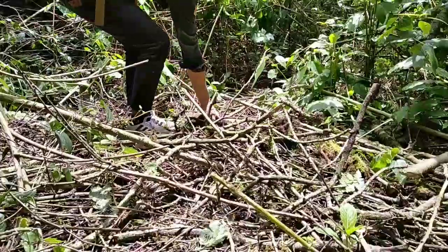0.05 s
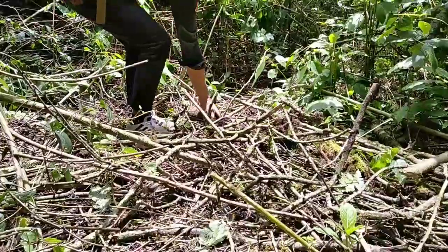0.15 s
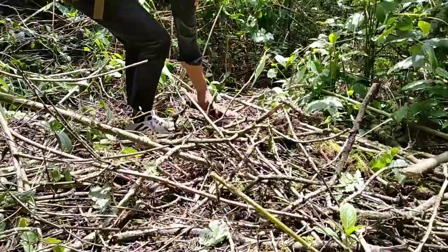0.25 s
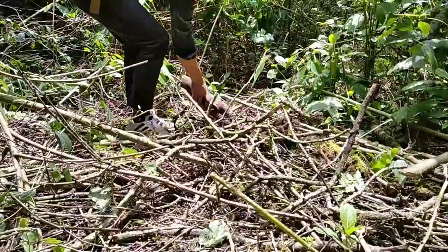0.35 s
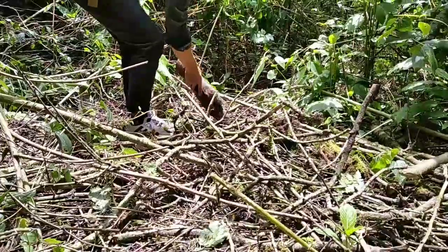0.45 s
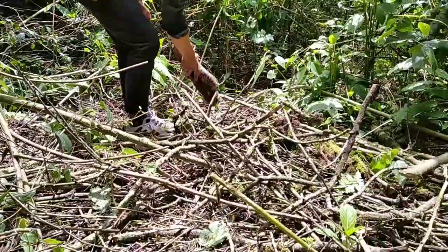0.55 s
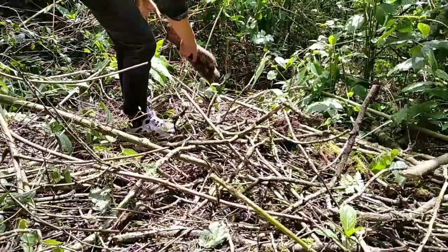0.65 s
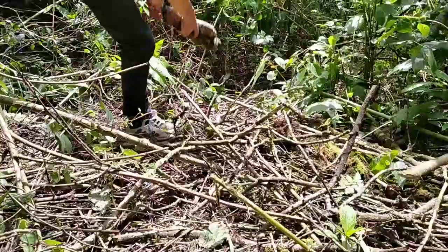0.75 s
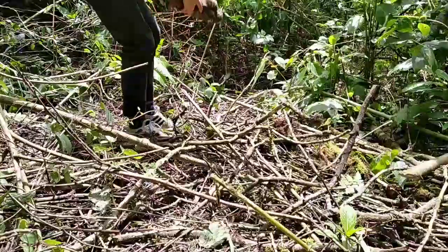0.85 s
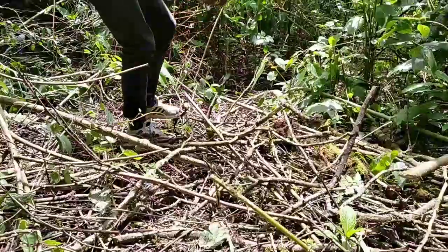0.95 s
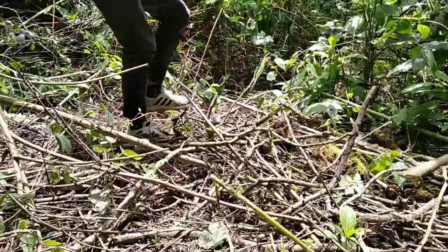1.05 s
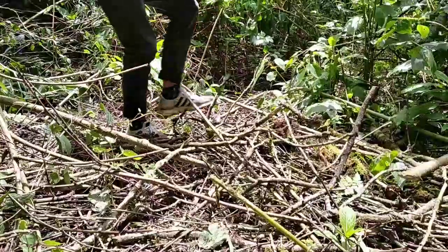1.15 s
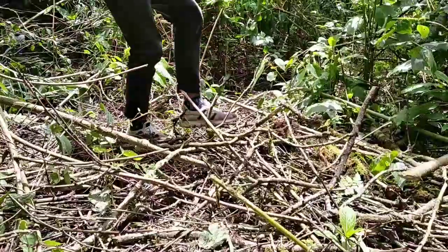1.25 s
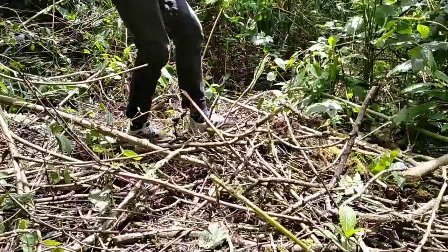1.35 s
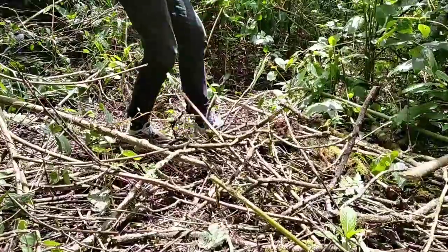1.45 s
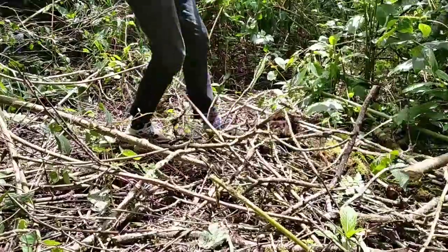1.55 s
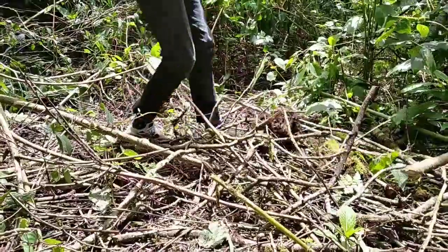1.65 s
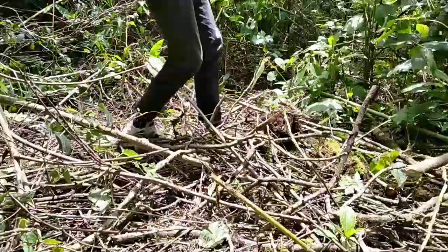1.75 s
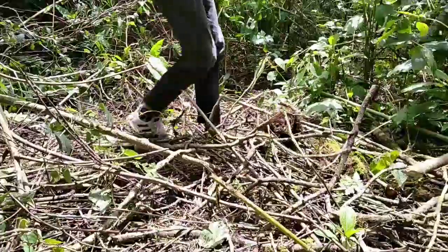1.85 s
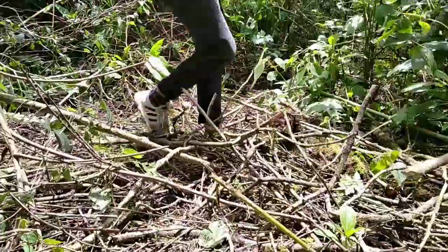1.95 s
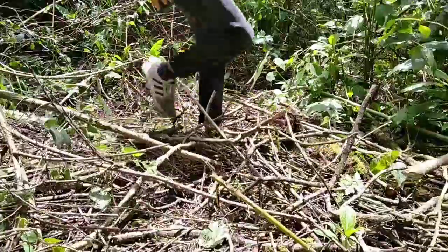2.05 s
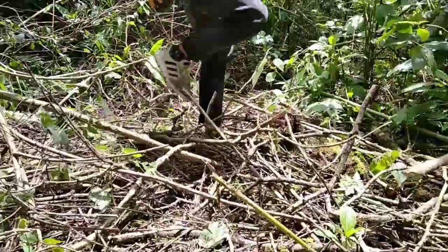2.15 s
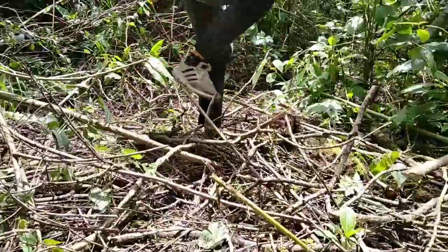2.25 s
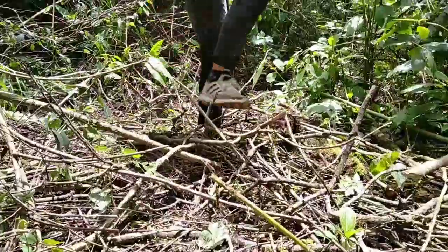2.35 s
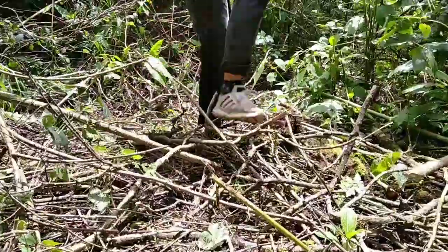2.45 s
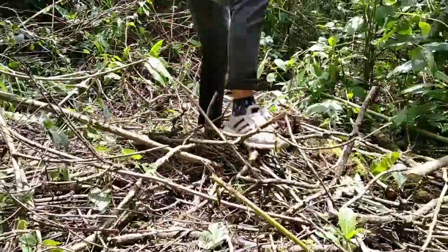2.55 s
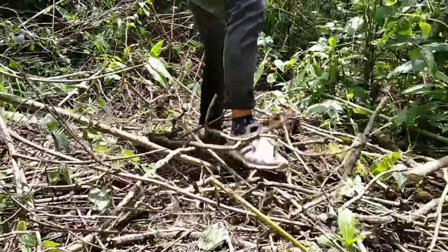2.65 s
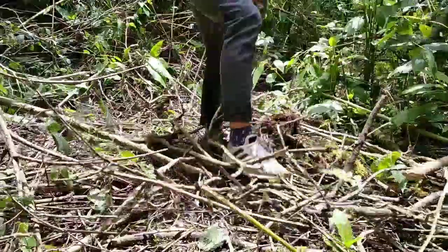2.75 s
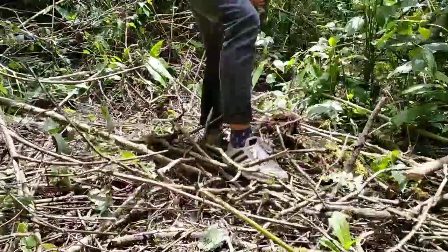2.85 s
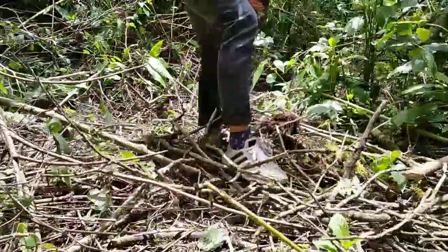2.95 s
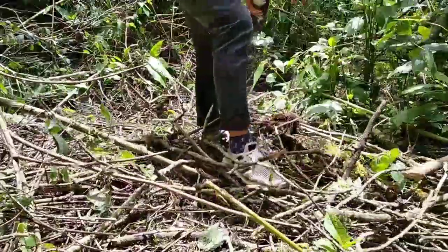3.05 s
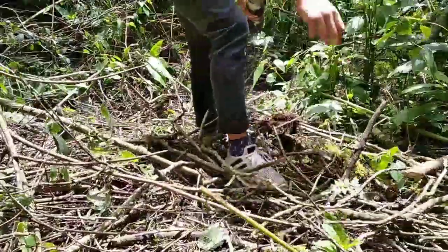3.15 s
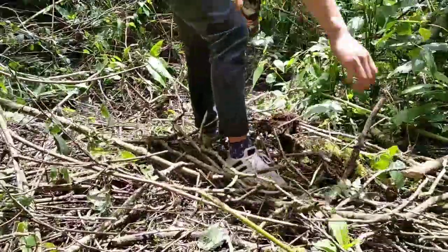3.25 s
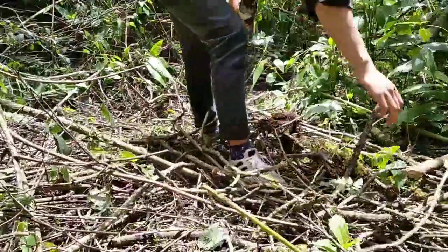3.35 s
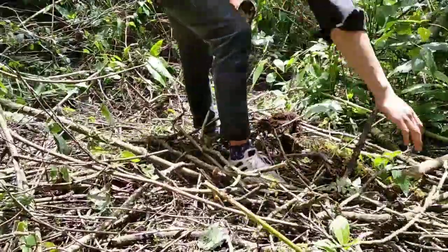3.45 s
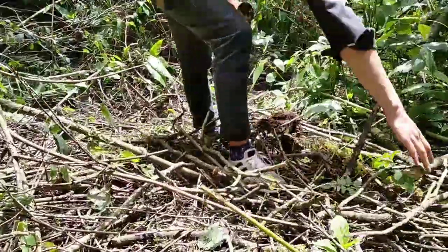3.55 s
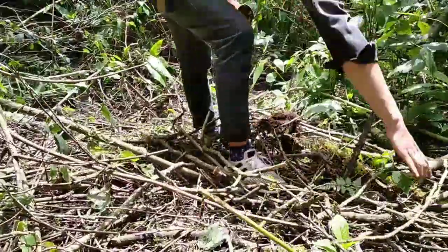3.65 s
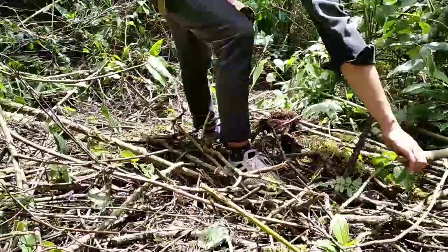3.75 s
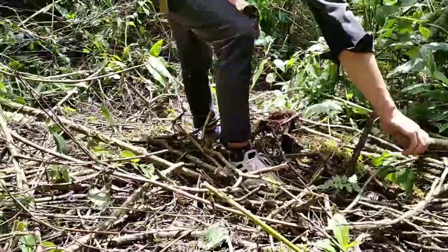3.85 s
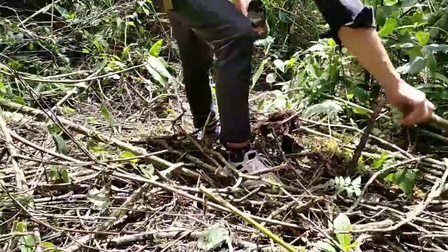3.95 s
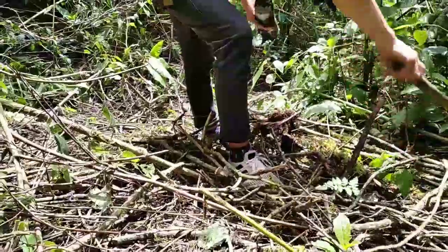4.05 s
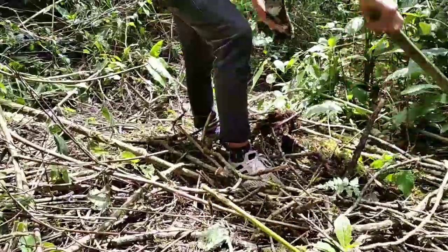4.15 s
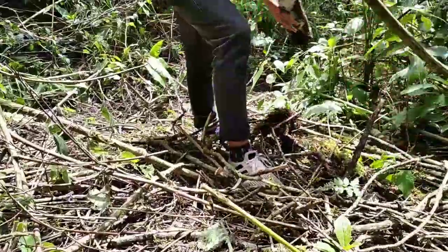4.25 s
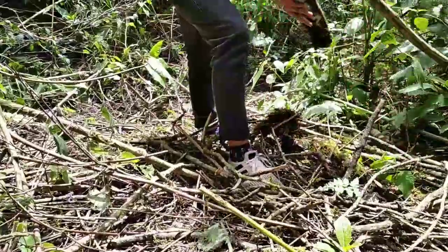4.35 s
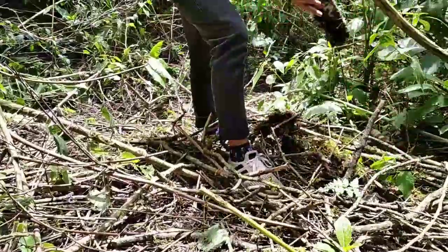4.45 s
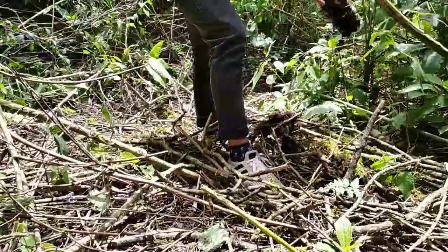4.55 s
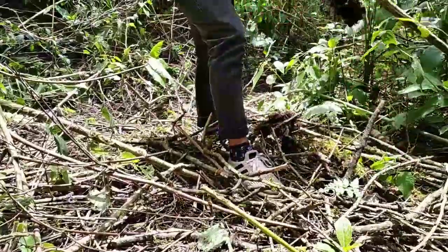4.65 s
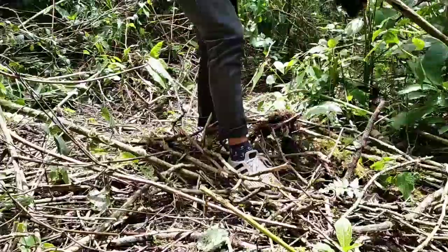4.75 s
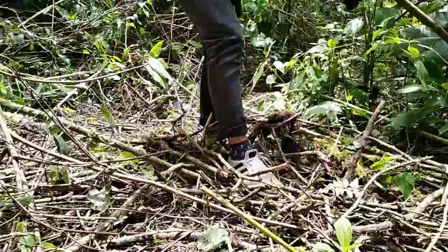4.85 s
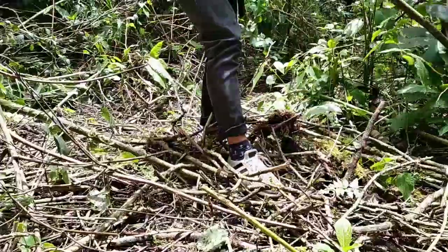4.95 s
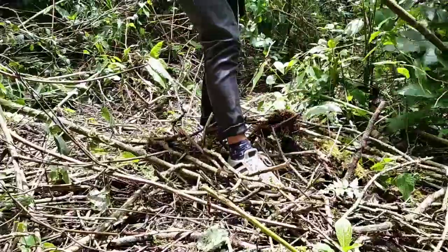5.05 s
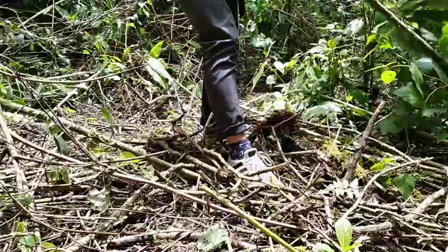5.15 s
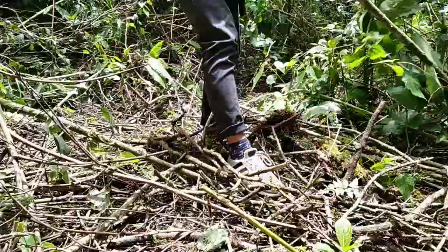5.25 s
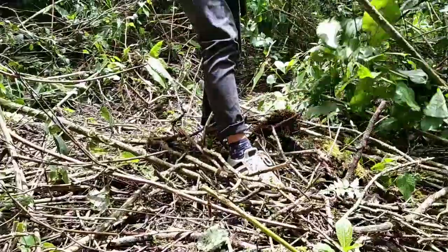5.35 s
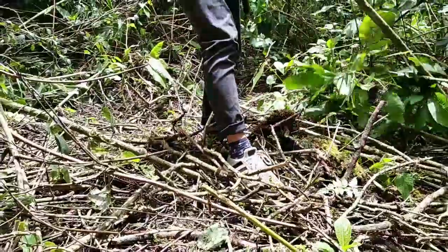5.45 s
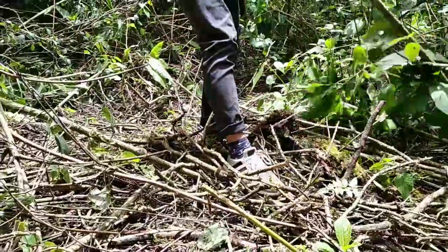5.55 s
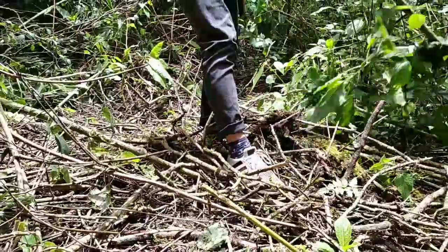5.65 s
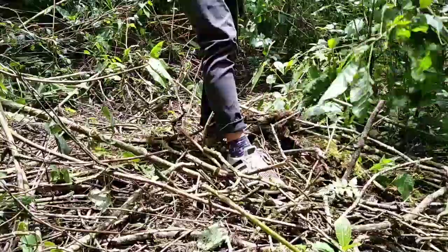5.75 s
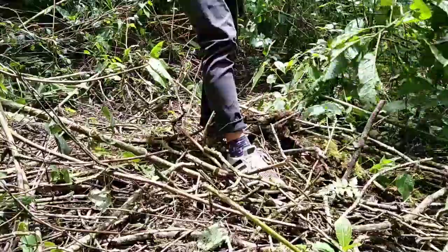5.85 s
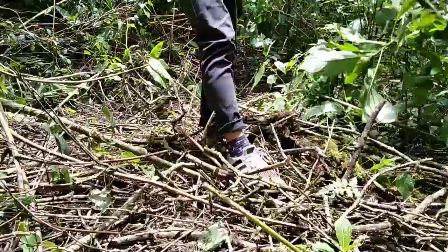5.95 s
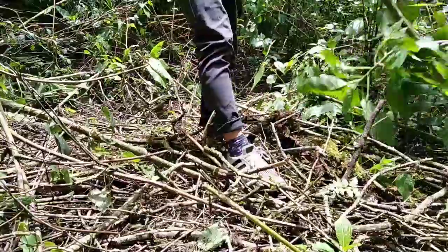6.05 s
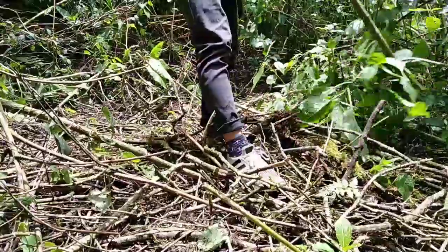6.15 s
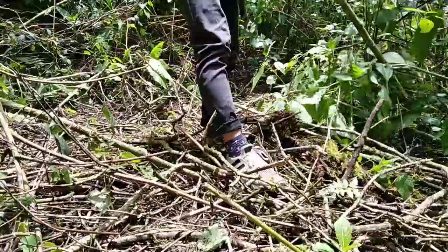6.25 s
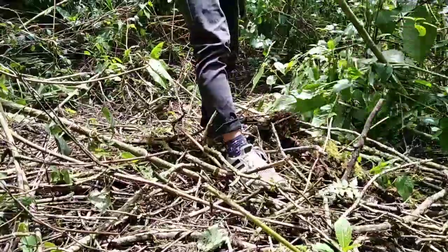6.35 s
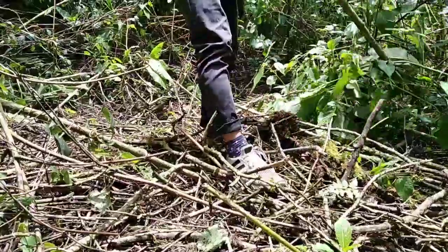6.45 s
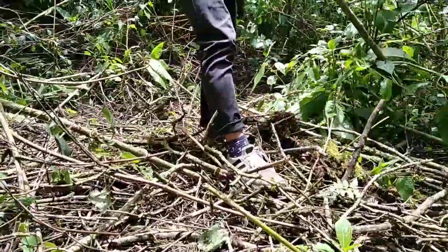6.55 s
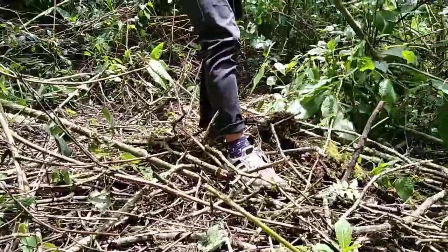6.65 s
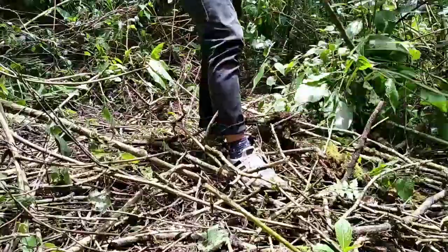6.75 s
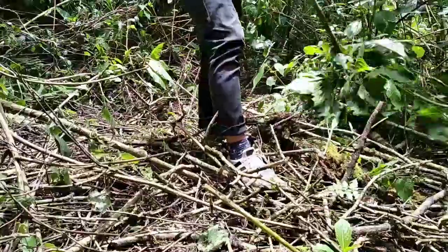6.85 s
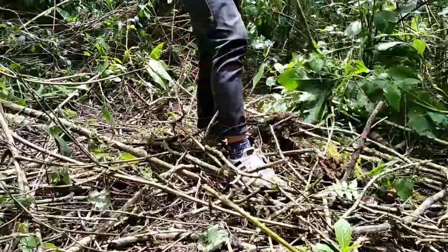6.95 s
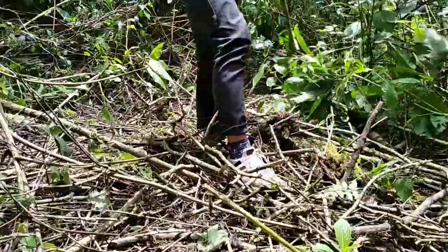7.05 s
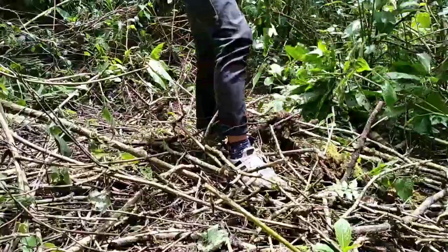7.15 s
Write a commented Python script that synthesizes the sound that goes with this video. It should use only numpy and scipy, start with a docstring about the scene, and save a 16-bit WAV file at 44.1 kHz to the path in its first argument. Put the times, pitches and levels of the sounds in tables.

```python
"""Dry twigs snap under slow steps in a forest, litter crackles, then a leafy branch is pulled out by hand.
Cracks are short noise bursts through wood resonances; scattered noise tails return them from the trees.
Litter and leaves are clumped tiny grains over rubbing noise. Near the end a soft low flutter, like wing beats,
made of low-pitched puffs, is heard mostly on the left. Faint filtered noise is the forest air."""
import sys
import numpy as np
from scipy import signal
from scipy.fft import rfft, irfft
from scipy.io import wavfile
from scipy.ndimage import uniform_filter1d

SR = 44100
rng = np.random.default_rng(int(sys.argv[2]) if len(sys.argv) > 2 else 0)


def waveform_to_disk(signal):
    """Save audio, clipped to [-1, 1], as 16-bit WAV at the path in sys.argv[1]."""
    frames = np.transpose(np.atleast_2d(signal))
    scaled = np.clip(frames, -1, 1) * 32767
    samples = np.round(scaled).astype(np.int16)
    wavfile.write(sys.argv[1], SR, samples)


N = 317520

# bands of a crack, thud, wood, splinter, fibre: low edge f/Hz, high edge f/Hz
BAND_EDGES_HZ = [(140, 760), (700, 2400), (2400, 6000), (6000, 15500)]
# colour of a crack: f/Hz, gain/dB
CRACK_SPECTRUM = [(150, -2), (320, 9), (410, 6.5), (560, 13.5), (720, -1), (1000, 0), (1250, -3.5),
                  (1800, 0), (3100, 3), (4300, 3.5), (5200, -2.5), (7000, 1.5), (8800, 3), (11000, -5),
                  (14000, -8)]
# drag of the leafy branch: t/s, leaf swish level/dB, dull stem brush level/dB (before trims)
DRAG_CURVE = [(4.1, -56, -64), (4.35, -53.5, -60), (4.42, -50.5, -60), (4.75, -54, -61),
              (4.93, -53.5, -60.5), (5.0, -48, -57.5), (5.08, -54, -62.5), (5.42, -47.5, -53),
              (5.49, -49, -56.5), (5.56, -45, -52), (5.62, -49, -53.5), (5.76, -49, -56), (5.83, -45, -49),
              (5.92, -50, -55), (6.03, -62, -68), (6.1, -55, -61), (6.2, -46.5, -52.5), (6.31, -51.5, -56),
              (6.42, -50, -58.5), (6.51, -55.5, -60), (6.6, -56, -61), (6.73, -62.5, -66), (6.8, -45, -51),
              (6.95, -41.5, -48), (7.2, -53.5, -58)]

PULL_S = 4.1  # the branch is pulled from here on
BENDING_RATIO = 3  # second bending mode of a free stick over its first
THIN_HZ = 1980  # ring of a thin twig


def twigs(thin_clean_db=-2, mode_echo_db=-9, ground_pan_db=-1.5, branch_pan_db=2, spot_count=3):
    """Every listed twig breaks, and its echo among the trees differs from spot to spot."""
    # breaking twigs: t/s, crack level/dB over 1 ms, wood body/dB and thud/dB re crack,
    # wood ring f/Hz, tearing time/s, forest echo/dB
    snap_rows = [(0.2157, -34, -8, -11, 1720, 0.0021, -1), (0.2849, -33, -10, -23, 2230, 0.0013, -7),
                 (0.299, -39, -15, -25, 2200, 0.0016, -17), (0.384, -34, -7, -41, 1790, 0.0035, -2),
                 (0.404, -44, -18, -25, 2000, .0015, -8), (0.446, -34.5, -14, -26, 1560, 0.0013, -6.5),
                 (0.48, -47, -7, -15, 1700, .0015, 10), (0.9041, -12.5, -7.5, -14, 960, 0.0017, -8.5),
                 (1.0031, -31.5, -10, -25, 2020, 0.0021, -3), (1.172, -55, -7, -20, 2100, 0.0017, -16),
                 (1.199, -50, -30, -35, 2300, .002, -12), (1.376, -57, 3, 6, 1100, 0.0061, 1),
                 (1.395, -38, -3.5, -14, 1690, 0.002, 0.5), (1.403, -38.5, -4.5, -8, 1520, 0.0023, -7),
                 (1.4688, -36, -2, -8, 1700, 0.009, 2.5), (1.4902, -32.5, -3, -22, 1940, 0.0047, -5),
                 (1.516, -36, -9, -21, 1800, 0.0035, -7), (1.538, -46, -2, -11, 1600, .003, -13),
                 (1.579, -41, -6, -8, 1880, .003, -3), (1.6003, -14.5, -13.5, -11, 2600, 0.0017, -9),
                 (1.6696, -10.5, -12, -22, 1940, 0.0017, -0.5), (1.7238, -31, -2, -14, 1870, 0.0058, -17),
                 (1.741, -41, -5, -18, 1800, 0.0017, -13), (1.788, -42, -2, -18, 1700, 0.0017, -12),
                 (1.808, -43, -2, -10, 1300, 0.0022, -2), (1.912, -41.5, -4.5, -15, 2000, 0.0075, 0),
                 (1.9333, -38.5, -1.5, -18, 1550, 0.0011, 3), (1.9697, -33.5, -9, -15, 1880, 0.001, 5),
                 (1.9864, -18.5, -12.5, -13.5, 1370, 0.0019, -7.5), (2.007, -35.5, -5, -21, 1700, .003, 5),
                 (2.033, -27.5, -15.5, -31, 2930, 0.0028, -5),
                 (2.0415, -22.5, -11, -9.5, 940, 0.0031, -7.5), (2.075, -48, 2, -19, 1500, .0015, -6),
                 (2.227, -47.5, -12, -20, 1712, .002, -3), (2.325, -52, -3, -18, 2000, .0015, -10),
                 (2.381, -51, -6, -20, 2000, .002, -8), (2.484, -49.5, -10, -19, 2000, 0.0033, -8),
                 (2.6326, -38.5, -15, -12, 1700, 0.011, -18), (2.656, -31, -10, -16, 2180, 0.0059, 1),
                 (2.661, -35.5, -12, -27, 2080, 0.0057, 1), (2.692, -40.5, -1, -11, 2000, 0.0027, -1),
                 (2.704, -47, 1, -5, 1500, 0.0033, -8), (2.743, -54, -10, -3, 1800, 0.0034, -8),
                 (2.787, -49, -3, -17, 1900, .004, -4), (2.807, -42, 5, -7, 1080, 0.0031, 4),
                 (2.8231, -31.5, 0, -5, 2130, 0.0021, -4), (2.8366, -29, -16, -21, 2290, 0.003, -1.5),
                 (2.853, -43, -7, -24, 2200, .0015, -8), (2.865, -44, 1.5, -14, 1980, 0.0039, 0),
                 (2.8791, -32.5, -9.5, -10, 1750, 0.0028, -2), (2.899, -47.5, 10.5, 4.5, 1410, 0.0032, -19),
                 (2.932, -41, -11, -22, 2400, 0.0046, -11), (3.0027, -13.5, -14, -25, 2250, 0.003, -8),
                 (3.0778, -14, -12.5, -27, 960, 0.0024, -9), (3.0864, -23, -25, -35, 2300, 0.0051, -20),
                 (3.0954, -29, -14, -31, 2304, 0.0019, -18), (3.1317, -22.5, -10, -26, 2020, 0.0046, -4),
                 (3.139, -25.5, -17, -30, 1500, 0.0024, -12), (3.154, -27, -10, -17.5, 2200, 0.0077, -5),
                 (3.166, -34, -9, -24, 2100, .0018, -16), (3.2055, -32, -13, -16, 1940, 0.0011, -17),
                 (3.2173, -22, -7, -23, 2670, 0.0023, -10), (3.2357, -27, -15, -16, 1940, 0.0014, -12),
                 (3.2487, -20.5, -9, -17, 2100, 0.0035, -14), (3.254, -16.5, -20, -15, 2080, 0.002, -27),
                 (3.3243, -15, -18, -44, 2520, 0.0029, -11), (3.3719, -23.5, -7, -9, 2300, 0.0015, -11),
                 (3.3955, -22, -15, -26, 1690, 0.0076, -14), (3.4025, -12, -12.5, -17, 1580, 0.0016, -21),
                 (3.415, -40, -6, -26, 1900, .002, -14), (3.4285, -36, -15, -20, 1700, .003, -11),
                 (3.4397, -18, -15, -40, 1700, 0.0026, -20), (3.45, -39.5, 7, -3, 1200, .002, -9),
                 (3.4558, -26, -8, -38, 1670, 0.0061, -12), (3.5737, -43.5, -4, -13, 1870, 0.00087, -5),
                 (3.6288, -32.5, -60, -28, 2240, 0.0015, -9), (3.674, -59, 15.5, -8, 1540, 0.0016, -11),
                 (3.761, -48.5, 9, 5, 1370, 0.0024, -11), (3.807, -44, -10, -28, 2200, .0015, -6),
                 (3.8655, -15.5, -1, -18, 1670, 0.0048, -26), (3.87, -23, -8, -21, 2340, 0.0066, -4),
                 (3.968, -37, -38, -33, 2260, 0.0013, 0), (4.0054, -23, -10, -18, 2200, 0.0048, -3),
                 (4.027, -32, -18, -42, 1910, 0.002, -18), (4.044, -36, -19, -30, 1980, .001, -14),
                 (4.058, -30.5, -20, -39, 1830, 0.0029, -10), (4.1435, -45.5, -14, -22, 2200, 0.0011, -14),
                 (4.2202, -30.5, -16, -25, 2250, 0.0024, -9), (4.2638, -33.5, -10, -26, 1000, 0.0037, 0),
                 (4.277, -45, 3.5, -4, 1010, 0.0048, -16), (4.284, -50, -11, -5, 1320, .003, -14),
                 (4.297, -42, -21, -4, 2020, 0.0062, -2), (4.3079, -26.5, -14, -16, 1650, 0.0019, -4.5),
                 (4.65, -43.5, -5.5, -6, 2120, 0.0039, 5), (4.8842, -59.5, 17, 14.5, 1030, 0.0017, 0),
                 (4.9036, -42, 0.5, -29, 2250, 0.0019, -14), (5.122, -20, -14, -42, 2110, 0.0022, -13),
                 (5.1303, -42.5, 2.5, -6.5, 1820, 0.0018, -16), (5.187, -44, -6, -22, 2700, .0012, -12),
                 (5.2028, -16, -15.5, -25, 1915, 0.0046, -10), (5.278, -43, -3, -22, 2100, .002, -14),
                 (5.291, -43.5, 2, -19, 990, 0.0048, -20), (5.332, -32, -22, -32, 2200, 0.0046, 3),
                 (5.346, -21.5, -12.5, -30, 1906, 0.0016, -6.5), (5.373, -51.5, 10.5, -24, 1830, 0.0019, 8),
                 (5.5349, -40.5, -5, -5.5, 1781, 0.0019, 6), (5.554, -39.5, -6, -22, 2340, .003, 1),
                 (5.64, -41, -7, -10, 980, 0.0018, -12), (5.664, -43.5, -3, -20, 3750, 0.0011, -12),
                 (5.7202, -35, -1, -16, 1940, 0.00092, -3), (6.116, -38.5, -7.5, -24, 1650, 0.006, -15),
                 (6.158, -34.5, -12, -33, 2100, .0042, -12), (6.2292, -34, -2, -15, 1870, 0.002, -4),
                 (6.273, -31.5, -22, -30, 2070, 0.002, -11), (6.4432, -34, -11.5, -30, 2206, 0.011, -3),
                 (6.555, -41.5, 1, -10, 2020, 0.0063, -10), (6.871, -42, 3, -10, 1010, 0.0032, -8),
                 (6.8791, -21.5, -8.5, -28, 1960, 0.0029, -2.5), (7.009, -38, -6, -29, 2000, 0.0041, 4.5)]
    # modes of the loudest sticks: t/s of the snap, clean break/dB re tearing, [(f/Hz, level/dB over 1 ms), ..]
    mode_rows = [(0.2171, 11, [(470, -42.5), (1640, -37), (8930, -44)]), (0.9055, 8.5, [(300, -43),
                 (540, -34), (930, -25), (1480, -24.5), (1800, -42), (9000, -14.5)]),
                 (1.6009, 3, [(480, -39.5), (2150, -24), (2700, -26), (3500, -29.5), (4300, -25),
                 (7200, -20)]), (1.6698, -19, [(2050, -21), (2500, -18), (3400, -37), (4400, -24),
                 (7300, -16.5), (9500, -20)]), (1.9862, 9, [(330, -40), (560, -45), (900, -33.5),
                 (1550, -34.5), (3200, -40), (5800, -21), (9300, -33)]), (2.0429, 6, [(290, -43),
                 (950, -37), (2080, -48), (4100, -29), (9330, -36)]), (2.8231, 14, [(260, -42), (1020, -42),
                 (2200, -27), (2600, -31.5), (3200, -33.5), (9140, -23)]), (3.0043, -13, [(1960, -37),
                 (2450, -27.5), (4570, -26), (7950, -15.5)]), (3.0783, -3, [(550, -42), (950, -30.5),
                 (1250, -34), (3500, -36), (4320, -26), (8880, -41)]), (3.218, -3, [(240, -37.5),
                 (1840, -31), (2680, -23.5), (4520, -31), (9310, -24)]), (3.2548, -5, [(2000, -31),
                 (2400, -25), (3100, -47), (4160, -29.5), (7400, -18), (9500, -36)]),
                 (3.3257, 8, [(1600, -34), (2480, -24), (7560, -22.5)]), (3.3724, 2, [(1700, -30.5),
                 (2480, -21.5), (2750, -33), (4300, -49), (7690, -26)]), (3.4029, 9, [(450, -36.5),
                 (1000, -38), (1700, -24), (2450, -23), (4200, -24), (7400, -27)]),
                 (3.4405, -4, [(1710, -49), (4580, -31), (8510, -32)]), (3.8665, 3, [(280, -35), (620, -29),
                 (1000, -37.5), (1700, -28), (2250, -28), (4500, -27), (7000, -18.5), (8630, -31)]),
                 (4.0056, 10, [(2430, -58), (4590, -35.5), (8350, -31)]), (4.2206, 7, [(280, -57),
                 (2450, -34.5), (3400, -44), (4500, -42.5), (7600, -39)]), (4.2637, 10, [(1000, -47),
                 (1650, -50), (2400, -54), (4300, -36), (9500, -33)]), (4.3072, 15, [(330, -52),
                 (2000, -37), (4000, -32), (8500, -22)]), (5.122, 5, [(480, -43.5), (2200, -51),
                 (8000, -35)]), (5.2038, 5, [(900, -50), (2750, -37.5), (3800, -29.5), (5940, -29),
                 (9400, -34)]), (5.347, 5, [(1000, -61), (1900, -34.5), (4270, -25), (7500, -29),
                 (10110, -20.5)]), (5.5349, -1, [(320, -39.5), (1000, -40.5), (1750, -39.5), (2700, -52),
                 (4200, -45)]), (6.8792, 5, [(1000, -59), (2000, -47), (7300, -25.5)])]
    # change of the tearing noise of such a stick: thud/dB, wood/dB, splinter/dB, fibre/dB
    rasp_change_db = (-6.5, -6, -5, -1)
    direct = np.zeros((2, N))
    spots = np.zeros((spot_count, 2, N))
    clicks = all_round()
    signs = (-1) ** np.arange(len(clicks))  # neighbouring bands join without a notch
    impulse = signal.unit_impulse(clicks.shape[1])
    times_s = np.array(snap_rows)[:, 0]
    own_modes = {np.argmin(abs(times_s - s)): own for s, *own in mode_rows}
    for k, (s, db, wood_db, thud_db, wood_hz, tear_s, echo_db) in enumerate(snap_rows):
        levels_db, rings_hz = stick(db, wood_db, thud_db, wood_hz)
        clean_db, modes = own_modes.get(k, (thin_clean_db, []))
        rasp_db = levels_db + rasp_change_db if modes else levels_db
        pan_db = ground_pan_db if s < PULL_S else branch_pan_db
        add(direct, s, snap(rasp_db, rings_hz, tear_s, pan_db, clean_db, modes))
        ringing = sum(amp(mode_db + mode_echo_db) * mode(impulse, hz) for hz, mode_db in modes)
        echoed = signs * amp(levels_db) @ clicks + np.std(clicks) * ringing
        add(spots[k % spot_count], s, amp(echo_db) * echoed[None])
    return direct + sum(forest(sent) for sent in spots)


def snap(levels_db, rings_hz, tear_s, pan_db, clean_db=-3, modes=(), lead_db=-6, lead_share=0.34,
         grainy_db=2.0, shiver_db=-25, shiver_s=0.02, ring_db=-3, quality=10, push_db=-4, knock_db=-3,
         knock_quality=3, break_s=.0011, break_decay_s=.0003, size=2048):
    """A few fibres give way, one sharp crack, a dying tearing volley rings the stick, the freed ends shiver."""
    t = np.arange(size) / SR - break_s
    since = np.maximum(t, 0)
    before = amp(lead_db) * np.exp(np.minimum(t, 0) / (lead_share * tear_s))
    clean = amp(clean_db) * np.exp(-since / break_decay_s)
    tearing = np.exp(-since / tear_s)
    shiver = amp(shiver_db) * np.exp(-since / shiver_s)
    envelope = np.where(t < 0, before, clean + tearing + shiver)
    grain = amp(grainy_db * rng.standard_normal(size))
    fibres = envelope * grain * rng.standard_normal((2, size))
    crack = unit(colour(levelled(fibres) if modes else fibres, CRACK_SPECTRUM))

    # the stick springs back whole: push and knock are common to both microphones
    shared = crack[:1] * np.ones((2, 1))
    push = band(since * np.exp(-since / (tear_s / 10)), *BAND_EDGES_HZ[0], order=2)
    knock = ring(shared, rings_hz[0] / BENDING_RATIO, knock_quality)
    thud = unit(band(shared, *BAND_EDGES_HZ[0], order=2))
    thud = thud + amp(push_db) * unit(push) + amp(knock_db) * unit(knock)
    sound = amp(levels_db[0]) * unit(thud)

    drives = [shared + 0.77 * crack, crack + 0.13 * shared, crack]
    for drive, db, hz, edges in zip(drives, levels_db[1:], rings_hz, BAND_EDGES_HZ[1:]):
        body = unit(band(drive, *edges))
        if not modes:
            body = body + amp(ring_db) * unit(ring(drive, hz, quality))
        sound = sound + amp(db) * unit(body)
    for hz, db in modes:
        sound = sound + amp(db) * mode(shared if hz < THIN_HZ else crack, hz)
    # rms 1 becomes the energy of 1 ms
    return sound * np.sqrt(SR / 1000 / size) * pan_gains(pan_db)


def stick(db, wood_db, thud_db, wood_hz, splinter_db=-1, wood_share=0.49, db_per_octave=5.5,
          splinter_max_hz=4200, fibre_hz=7620, spread=0.21):
    """Levels (thud, wood, splinter, fibre) and rings (last three); lower-ringing sticks splinter less."""
    thin_octaves = np.log2(wood_hz / THIN_HZ)
    total_splinter_db = splinter_db + wood_share * wood_db + db_per_octave * thin_octaves
    nominal_hz = np.array([min(wood_hz * BENDING_RATIO, splinter_max_hz), fibre_hz])
    upper_hz = nominal_hz * np.exp(spread * rng.uniform(-1, 1, 2))
    return db + np.array([thud_db, wood_db, total_splinter_db, 0]), [wood_hz, *upper_hz]


def mode(x, hz, base_width_hz=110, quality=16):
    """One mode of a loud stick at rms 1; its width has a fixed part and a part that grows with pitch."""
    return unit(ring(x, hz, hz / (base_width_hz + hz / quality)))


def ring(x, hz, quality):
    """One damped mode as a two-pole resonator."""
    r = np.exp(-np.pi * hz / quality / SR)
    return signal.lfilter([1, 0, -1], [1, -2 * r * np.cos(2 * np.pi * hz / SR), r * r], x)


def all_round(size=2048):
    """A crack averaged over all directions has no ripple: one smooth click a band, with the energy of 1 ms."""
    click = kernel(lambda hz: read(CRACK_SPECTRUM, hz), size)
    clicks = [unit(band(click, *edges, order=2)) for edges in BAND_EDGES_HZ]
    return np.array(clicks) * np.sqrt(SR / 1000 / size)


def levelled(x, size=21):
    """Evens out the chance spectral ripple of a short burst, so that later filters alone give its colour."""
    spectrum = np.fft.fft(x)
    log_gain = -np.log(uniform_filter1d(abs(spectrum) ** 2, size, mode="wrap") + 1e-20) / 2
    return np.fft.ifft(spectrum * np.exp(np.conj(signal.hilbert(log_gain)))).real


def twiglets(ground_db=6, branch_db=-1.5, ground_wood_db=-4, branch_wood_db=0, thud_db=-10, vary_db=4,
             spread_db=3.5, wood_hz=1800, tear_s=0.0047, echo_db=-6, count=130):
    """Thin twigs tick by chance, louder and denser with press or drag; green stems knock duller."""
    on_ground = np.arange(N) / SR < PULL_S
    load_db = np.where(on_ground, pressure()[0] + ground_db, follow(DRAG_CURVE)[0] + branch_db)
    work = np.cumsum(amp(load_db / 2))
    chance = rng.uniform(-1, 1, (count, 4))
    out = np.zeros((2, N))
    for k, (when, size, body, ring_step) in enumerate(chance):
        work_share = (k + (when + 1) / 2) / count  # one tick in each equal share of the work
        at = min(np.searchsorted(work, work[-1] * work_share), N - 1)
        wood_db = (ground_wood_db if on_ground[at] else branch_wood_db) + vary_db * body
        tick_db = load_db[at] + spread_db * size
        twig = stick(tick_db, wood_db, wood_db + thud_db, wood_hz * 2 ** (ring_step / 2))
        add(out, at / SR, snap(*twig, tear_s, 0))
    return out + amp(echo_db) * forest(out)


def forest(x, near_db=-10, near_t60=0.17, far_db=-17, far_t60=0.51, ground_db=-13, build_s=0.01):
    """Ground and nearby sticks answer first, then foliage, then far trunks, as decaying scattered noise."""
    # scatter from trunks and foliage: f/Hz, gain/dB
    echo_spectrum = [(100, -27), (400, -23.5), (800, -1), (2000, 4.5), (5000, 2.5), (9000, 8), (15000, 7)]
    t = np.arange(SR) / SR
    reflectors = amp(4.5 * rng.standard_normal(SR))
    scatter = paired(rng.standard_normal((2, SR)) * reflectors)
    power = 0
    for db, t60, rise_s in [(near_db, near_t60, build_s), (far_db, far_t60, 4 * build_s), (ground_db, .04, .002)]:
        tail = amp(-60 * t / t60) * (1 - np.exp(-(t / rise_s) ** 2))
        power = power + (amp(db) * unit(tail)) ** 2
    response = colour(unit(scatter) * np.sqrt(power / SR), echo_spectrum)
    return signal.fftconvolve(x, response, axes=1)[:, :N]


def litter(crisp_trim_db=1):
    """Dead leaves, bark and twig ends crumble under the weight."""
    # colour of the litter: f/Hz, gain/dB
    litter_spectrum = [(88, -28), (150, -15), (306, 6.5), (401, -3.5), (515, 0.5), (661, -17), (1030, -3),
                       (1300, -7), (1770, 4.5), (3030, -7.5), (4210, -2), (5720, -5), (8580, 3),
                       (13900, -15.5), (15000, -31)]
    crisp_db, dull_db = pressure()
    grains = crackle(per_s=2000, spread_db=3.6, rub_db=-12, clump_db=1.1, cycles=1.4)
    return pressed(grains, litter_spectrum, crisp_db + crisp_trim_db, dull_db)


def pressure(press_s=0.023, release_s=0.054, settle_db=-72, settle_dull_db=-74):
    """Crisp and dull litter levels in dB: each press builds up, holds, dies away; settling goes on between."""
    # presses of shoe or hand: start t/s, held t/s, crackle level/dB, dull crunch level/dB (before trims)
    press_rows = [(0.202, 0.45, -63.5, -69), (1.0, .1, -64, -69), (1.44, 0.33, -50.5, -57.5),
                  (1.917, .06, -52, -51), (1.98, .05, -46.5, -57), (2.623, 0.21, -47, -53.5),
                  (2.9, 0.4, -59, -63.5), (3.215, 0.22, -48, -57), (3.741, 0.29, -56, -87)]
    t = np.arange(N) / SR
    power = amp([[settle_db], [settle_dull_db]]) ** 2 * np.ones(N)
    for start_s, held_s, crisp_db, dull_db in press_rows:
        build = np.clip((t - start_s) / press_s, 0, 1)
        release = np.exp(-np.maximum(t - start_s - held_s, 0) / release_s)
        power = power + (amp([[crisp_db], [dull_db]]) * build * release) ** 2
    return 10 * np.log10(power)


def crackle(per_s, spread_db, rub_db, clump_db, cycles, size=192):
    """Many tiny breaks and flicks, each of its own size and pitch, in clumps, over smooth rubbing."""
    when, pitch, strength, *phases = rng.random((round(per_s * N / SR), 5)).T[:, :, None]
    hz = 600 + 14000 * pitch ** 2
    t = np.arange(size) / SR
    sizes = amp(spread_db * np.minimum(-np.log(1 - strength), 4)) * hz ** .7
    envelopes = sizes * np.exp(-hz * t / cycles)
    at = ((when * N).astype(int) + np.arange(size)).ravel()
    ticks = []
    for phase in phases:  # left, right
        grains = envelopes * np.sin(2 * np.pi * (hz * t + phase))
        ticks.append(np.bincount(at, grains.ravel(), N)[:N])
    mix = unit(rattled(np.array(ticks))) + amp(rub_db) * rng.standard_normal((2, N))
    return paired(mottled(mix) * amp(clump_db * wander(30)))


def rattled(ticks, tail_db=-3, t60=.03, size=2048):
    """Each tick bounces briefly among the sticks and leaves around it."""
    tail = levelled(rng.standard_normal((2, size)) * amp(-60 * np.arange(size) / SR / t60))
    bounced = signal.oaconvolve(ticks, unit(tail) / np.sqrt(size), axes=1)[:, :N]
    return ticks + amp(tail_db) * bounced


def mottled(x, patch_db=1.7, size=256):
    """Leaves and scraps of different sizes take turns: the colour shifts in short, narrow patches."""
    z = signal.stft(x, nperseg=size)[2]
    patches = rng.standard_normal(z.shape[:0:-1])  # time, frequency
    patches = uniform_filter1d(uniform_filter1d(patches, 6, axis=0), 5, axis=1)
    return signal.istft(z * amp(patch_db * unit(patches).T), nperseg=size)[1][:, :N]


def pressed(grains, spectrum, crisp_db, dull_db):
    """Plays grains by a crisp and a dull level curve."""
    sound = colour(grains, spectrum)
    crisp = unit(band(sound, 2400, 16000))
    dull = unit(band(sound, 170, 2400))
    return amp(crisp_db) * crisp + amp(dull_db) * dull


def leaves(crisp_trim_db=1.5, pan_db=1.5):
    """Green leaves flick and slide past each other as the branch is drawn out."""
    # colour of the leaves: f/Hz, gain/dB
    leaf_spectrum = [(150, -10.5), (280, -10.5), (450, -16.5), (700, -19), (1000, -10), (1400, -14),
                     (2050, -3.5), (3000, -7), (4200, 0.5), (5100, -7.5), (7000, -1.5), (8900, 3.5),
                     (11500, -7), (14000, -10.5)]
    swish_db, brush_db = follow(DRAG_CURVE)
    grains = crackle(per_s=3000, spread_db=2.8, rub_db=0, clump_db=0.6, cycles=2)
    return pressed(grains, leaf_spectrum, swish_db + crisp_trim_db, brush_db) * pan_gains(pan_db)


def flutter(trim_db=-1, puff_s=0.0081, uneven_db=1):
    """Each beat is one soft puff of a few low cycles."""
    # low flutter in two bouts: t/s, beat rate f/Hz, level/dB (before trim), puff pitch f/Hz
    beat_rows = [(5.54, 11.8, -63, 100), (5.7, 13.3, -48.5, 113), (5.85, 26.5, -47.5, 119),
                 (6.11, 21.5, -51.5, 105), (6.2, 19.3, -54.5, 101), (6.4, 12.7, -55, 105),
                 (6.5, 18.5, -48.5, 122), (6.68, 28, -48, 134), (6.87, 27, -45, 113), (7.0, 21, -47.5, 114),
                 (7.2, 24, -48.5, 102)]
    rate_hz, db, hz = follow(beat_rows)
    started = np.arange(N) / SR > beat_rows[0][0]
    beats = np.cumsum(rate_hz * started) / SR
    from_beat_s = (beats - np.round(beats)) / rate_hz
    envelope = np.exp(-(from_beat_s / puff_s) ** 2 / 2) * (beats > .5)
    puffs = envelope * np.cos(2 * np.pi * hz * from_beat_s)
    return band(puffs, 66, 240, order=2) * amp(db + trim_db + uneven_db * wander(15))


def air(level_db=-63.5, swell_db=.7, swell_hz=1.7):
    """Faint wash of the distant forest: coloured noise with a slow swell."""
    # still forest air: f/Hz, gain/dB
    air_spectrum = [(25, -6), (50, -8.5), (80, 7), (130, 5), (280, 4), (450, 2), (900, -0.5), (2000, -3),
                    (4200, -3), (5300, -11.5), (8800, -4), (11000, -13), (14000, -13.5)]
    wash = colour(paired(rng.standard_normal((2, N))), air_spectrum)
    return amp(level_db + swell_db * wander(swell_hz)) * unit(wash)


def amp(db):
    """Decibels to gain."""
    return 10 ** (np.asarray(db) / 20)


def unit(x):
    """Scales to rms 1."""
    return x / np.sqrt(np.mean(x ** 2) + 1e-20)


def pan_gains(left_right_db):
    """Left and right gains from their level difference."""
    return amp([[left_right_db / 2], [-left_right_db / 2]])


def read(points, hz):
    """Reads a spectrum on a log-frequency axis."""
    f, value = np.transpose(points)
    return np.interp(np.log(hz + 1), np.log(f + 1), value)


def follow(rows):
    """Reads each column of a curve table at every sample."""
    s, *columns = np.transpose(rows)
    return [np.interp(np.arange(N) / SR, s, c) for c in columns]


def add(mix, s, sound):
    """Mixes a sound in at time s."""
    part = mix[:, max(round(s * SR), 0):][:, :sound.shape[1]]
    part += sound[:, :part.shape[1]]


def kernel(db_of_hz, size=2048):
    """Causal (minimum-phase) impulse response with the given gain curve."""
    log_gain = np.log(amp(db_of_hz(abs(np.fft.fftfreq(size, 1 / SR)))))
    return np.fft.ifft(np.exp(np.conj(signal.hilbert(log_gain)))).real


def colour(x, points):
    """Filters both channels causally by a spectrum."""
    return signal.oaconvolve(x, kernel(lambda hz: read(points, hz))[None], axes=1)[:, :x.shape[1]]


def band(x, lo, hi, order=3):
    """Causal band-pass."""
    return signal.sosfilt(signal.butter(order, [lo, hi], "band", fs=SR, output="sos"), x)


def paired(x):
    """Two unrelated signals become a microphone pair: alike in the bass, unrelated in the treble."""
    # left-right likeness: f/Hz, coherence/1
    coherence = [(60, 0.55), (280, 0.88), (640, 0.73), (1400, 0), (3000, 0.086), (15000, 0)]
    size = x.shape[1]
    left, other = rfft(x, 2 * size)
    same = np.clip(read(coherence, np.fft.rfftfreq(2 * size, 1 / SR)), -1, 1)
    right = same * left + np.sqrt(1 - same ** 2) * other
    return irfft(np.array([left, right]))[:, :size]


def wander(cutoff_hz):
    """Smooth random curve of rms 1: noise low-passed around cutoff_hz."""
    hz = np.fft.rfftfreq(N, 1 / SR)
    return unit(irfft(rfft(rng.standard_normal(N)) / (1 + (hz / cutoff_hz) ** 4), N))


def scene():
    """Walking gives way to pulling the branch: litter fades into leaves over 0.1 s."""
    pulling = np.clip((np.arange(N) / SR - PULL_S) / .1, 0, 1)
    rustle = np.sqrt(1 - pulling) * litter() + np.sqrt(pulling) * leaves()
    return twigs() + twiglets() + rustle + flutter() + air()


def record(dry, edge_hz=14600):
    """The right microphone hears far less bass than the left; then a low-pass limits the band."""
    # microphone difference: f/Hz, left re right/dB
    left_right = [(60, 11.5), (200, 16), (380, 8), (700, -2), (1300, 3.5), (2400, 2), (4400, -2.5),
                  (8100, 3.5), (15000, 5.5)]
    left = kernel(lambda hz: 20 * np.log10(2 / (1 + amp(-read(left_right, hz)))))
    right = kernel(lambda hz: 20 * np.log10(2 / (1 + amp(read(left_right, hz)))))
    heard = signal.oaconvolve(dry, np.array([left, right]), axes=1)[:, :N]
    low_pass = signal.firwin(255, edge_hz, window=("kaiser", 9), fs=SR)
    return signal.oaconvolve(heard, low_pass[None], "same")


dry = scene()
out = record(dry)
waveform_to_disk(out)
```